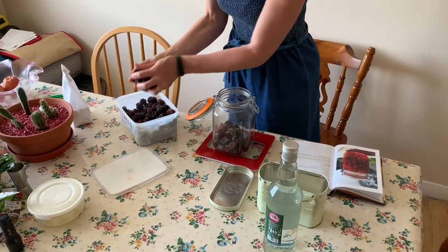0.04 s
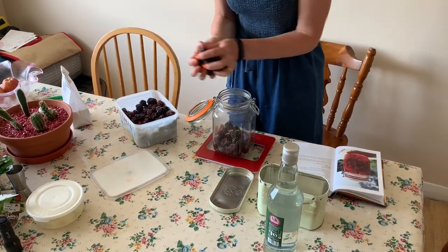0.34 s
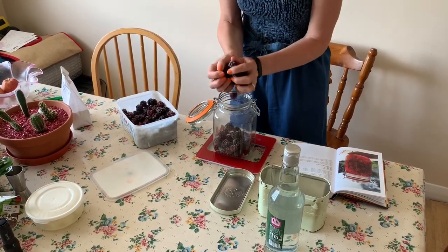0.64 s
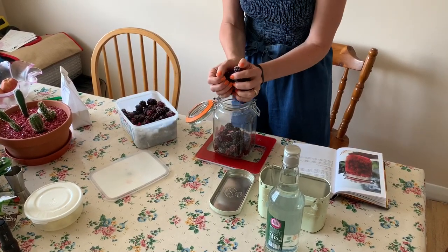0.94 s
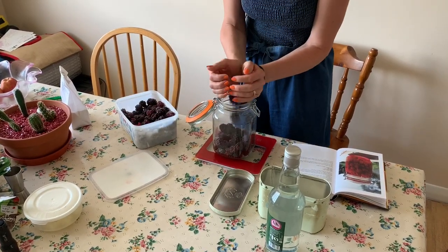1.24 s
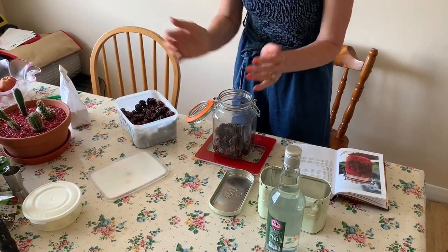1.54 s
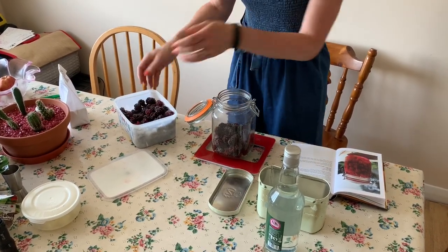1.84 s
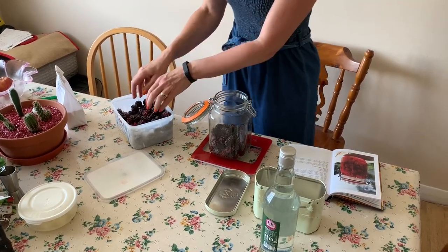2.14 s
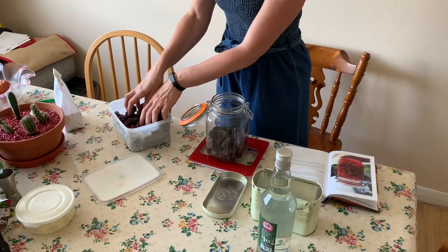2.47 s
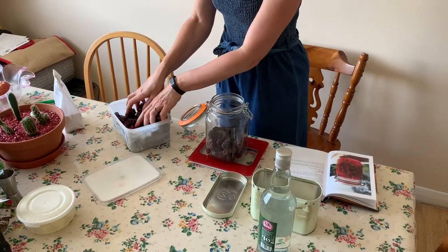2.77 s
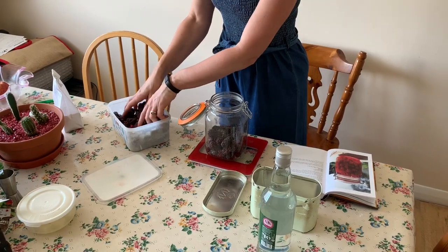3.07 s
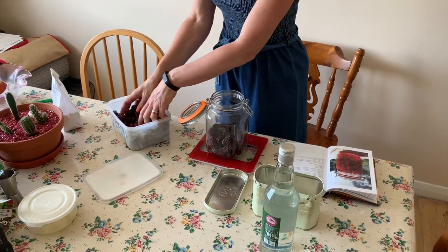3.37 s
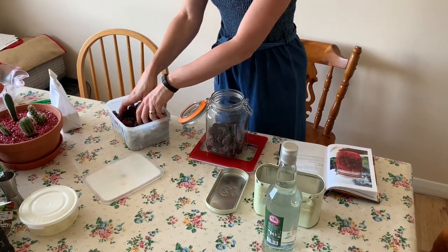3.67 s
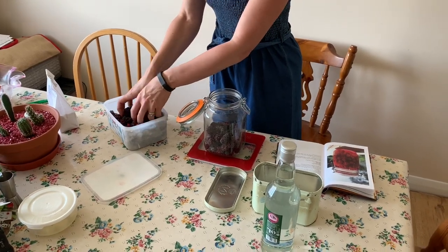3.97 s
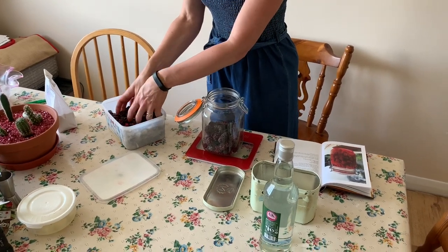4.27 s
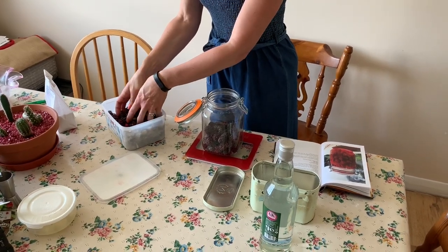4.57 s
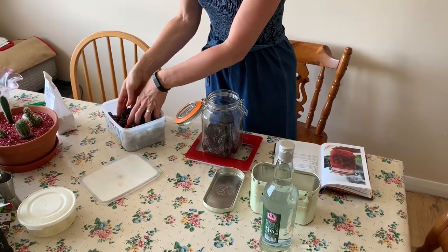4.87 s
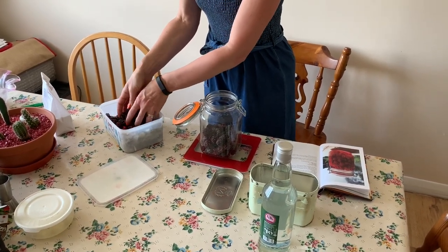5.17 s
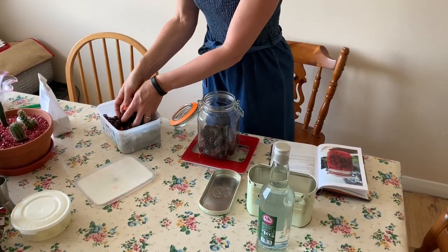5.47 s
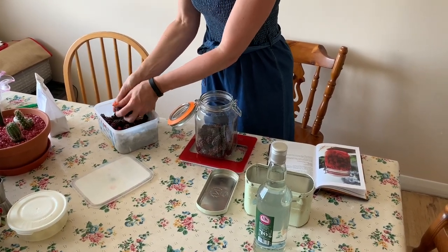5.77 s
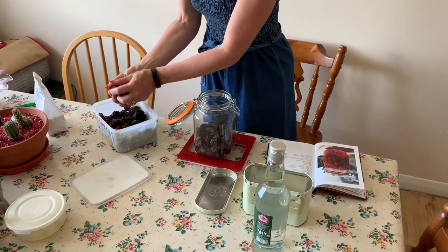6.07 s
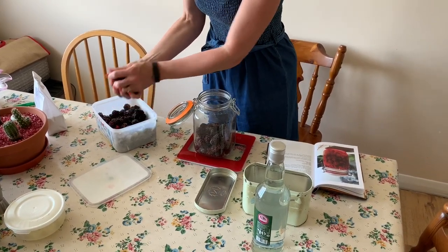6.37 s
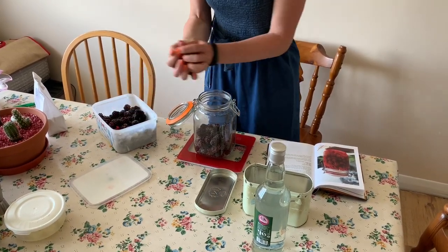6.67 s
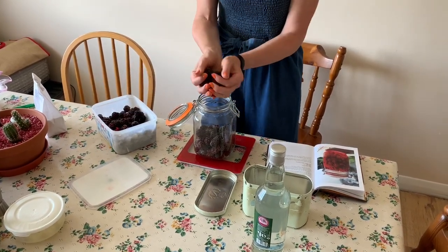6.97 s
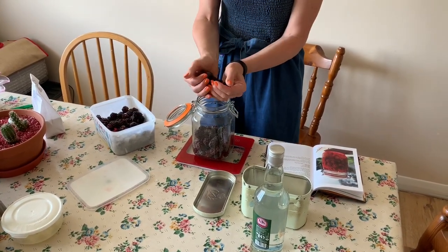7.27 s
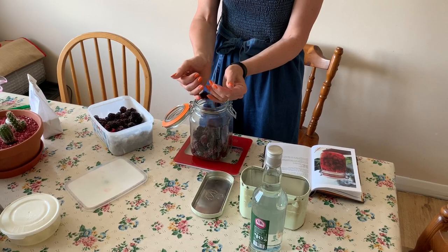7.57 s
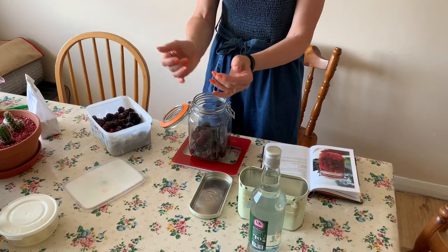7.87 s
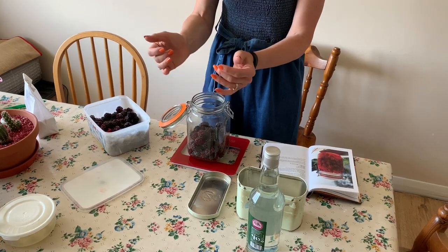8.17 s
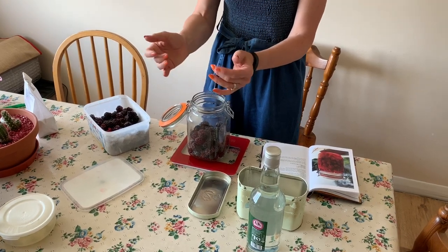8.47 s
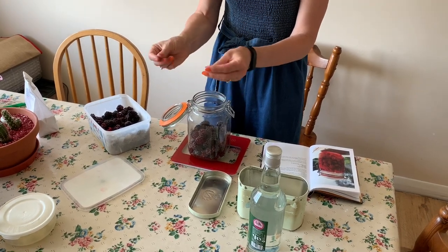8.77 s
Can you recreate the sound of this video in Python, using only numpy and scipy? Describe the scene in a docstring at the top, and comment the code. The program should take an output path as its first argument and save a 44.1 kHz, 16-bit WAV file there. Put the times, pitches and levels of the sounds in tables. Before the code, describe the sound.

Cupped hands rustle softly, then hard berries fall into a glass jar, clinking and knocking with a hollow hum. Slightly to the left, fingers dig through more berries in a plastic tub, clattering dully with ticks and an icy crunch. A second handful then drops into the jar straight ahead. The small kitchen adds a short echo, and a bird calls faintly outside.

```python
"""A faint bird outside and a rustle of cupped hands; then hard berries, probably frozen, drop into a
glass jar on a kitchen table: the glass clinks, the pile knocks and the air inside hums.
Between the two handfuls, fingers dig through the berries in a plastic tub, which clatters dully.
The jar stands almost straight ahead of a stereo microphone pair, the tub to its left,
and the small room answers every contact."""
import sys
import numpy as np
from scipy import signal
from scipy.fft import rfft, irfft, next_fast_len
from scipy.io import wavfile
from scipy.ndimage import uniform_filter1d, minimum_filter1d, map_coordinates

SR = 44100
rng = np.random.default_rng(int(sys.argv[2]) if len(sys.argv) > 2 else 0)


def pcm_store(signal):
    """Save signal as 16-bit PCM."""
    levels = np.round(np.clip(np.atleast_2d(signal), -1, 1) * 32767)
    wavfile.write(sys.argv[1], SR, levels.astype(np.int16).T)


N = 398223


def amp(db):
    """Decibels to gain."""
    return 10 ** (np.asarray(db) / 20)


def unit(x):
    """Scaled to rms 1."""
    return x / np.sqrt(np.mean(x ** 2) + 1e-20)


def along(points, hz):
    """(Hz, value) points read on a log frequency axis."""
    freqs, values = np.transpose(points)
    return np.interp(np.log(hz + 1), np.log(freqs), values)


def add(track, s, sound):
    """Mix a sound into a track at time s."""
    part = track[..., max(round(s * SR), 0):][..., :sound.shape[-1]]
    part += sound[..., :part.shape[-1]]


def filtered(x, response):
    """x shaped by a complex frequency response."""
    size = next_fast_len(N + SR // 2)
    return irfft(rfft(x, size) * response(np.fft.rfftfreq(size, 1 / SR)), size)[..., :N]


def through(x, impulse):
    """x played through an impulse response scaled to energy 1."""
    return signal.oaconvolve(x, impulse / np.linalg.norm(impulse))[:N]


def coloured(x, spectrum, size=2048):
    """Minimum-phase colouring: attacks stay sharp, and only the shape of the spectrum counts."""
    cepstrum = irfft(np.log(amp(along(spectrum, np.fft.rfftfreq(size, 1 / SR)))))
    cepstrum[1:size // 2] *= 2
    cepstrum[size // 2 + 1:] = 0
    return through(x, irfft(np.exp(rfft(cepstrum))))


def fade(t60):
    """Half a second of exponential decay."""
    return np.exp(-np.log(1000) * np.arange(SR // 2) / SR / t60)


def burst(t60):
    """A dying puff of noise."""
    return fade(t60) * rng.standard_normal(SR // 2)


def ring(modes, detune=0):
    """One decaying sine per (Hz, dB, t60) mode; its pitch wanders by the fraction detune."""
    hz, db, t60 = np.transpose(modes)[:, :, None]
    wander = signal.resample(rng.standard_normal((len(modes), 96)), SR // 2, axis=1)
    phase = 2 * np.pi * np.cumsum(hz * (1 + detune * wander), axis=1) / SR
    sign = (-1) ** np.arange(len(modes))[:, None]
    return sign * amp(db) * fade(t60) * np.sin(phase)


def grains(per_s, spread_db, t60):
    """Random tiny contacts of uneven size, each a short scrape; rms 1."""
    hits = (rng.random(N) < per_s / SR) * amp(spread_db * np.clip(rng.standard_normal(N), -2, 2))
    envelope = np.sqrt(np.abs(through(hits ** 2, fade(t60 / 2))))
    return unit(envelope * rng.standard_normal(N))


def gesture(start, length, attack, t60):
    """Gain of one movement: it rises, holds and dies away; all times in seconds."""
    t = np.arange(N) / SR - start
    return np.clip(t / attack, 0, 1) * np.exp(-np.log(1000) * np.clip((t - length) / t60, 0, 2))


def gestures(rows, attack, t60):
    """Gain of a series of (start, length, dB) movements, whose powers add."""
    return np.sqrt(sum((amp(db) * gesture(s, length, attack, t60)) ** 2 for s, length, db in rows))


def diffuse(x, spacing_m=0.13):
    """Two unrelated signals as a diffuse field at the microphone pair: alike in the bass only."""
    likeness = np.sinc(2 * np.fft.rfftfreq(x.shape[-1], 1 / SR) * spacing_m / 343)
    a, b = rfft(x)
    mid, side = a * np.sqrt((1 + likeness) / 2), b * np.sqrt((1 - likeness) / 2)
    return irfft([mid + side, mid - side], x.shape[-1])


def direct(x, lead_ms):
    """The straight path reaches the left microphone first."""
    return filtered(x, lambda hz: np.exp(1j * np.pi * hz * lead_ms / 1000 * np.array([[1], [-1]])))


# hiss of the kitchen: (frequency [Hz], relative level [dB])
HISS_SPECTRUM = [(59, -27), (100, -10), (648, -13.5), (4020, -19.5), (11000, -26), (16000, -35)]
# low rumble in the room: (time [s], level [dB])
RUMBLE_LEVELS = [(0, -69.5), (6.449, -66.5), (6.55, -57.5), (7.999, -59), (8.4, -66)]

def room_tone():
    """All around the microphones, faint hiss over a low rumble that swells and sinks."""
    def noise(spectrum):
        white = diffuse(rng.standard_normal((2, next_fast_len(N))))
        return unit(filtered(white, lambda hz: amp(along(spectrum, hz))))

    rumble = noise([(25, -35.5), (46, 0.0), (80, -14.0), (400, -26.5), (2000, -72.5)])
    swell = amp(np.interp(np.arange(N) / SR, *np.transpose(RUMBLE_LEVELS)))
    return amp(-76.5) * noise(HISS_SPECTRUM) + swell * rumble


# calls from outside: (time [s], relative level [dB])
BIRD_CALLS = [(0.04, -78), (1.559, -80), (6.045, -79), (6.22, -89), (8.555, -80.5)]

def bird(start_hz=4250, end_hz=3400, length_s=.24, rasp_hz=380):
    """A hoarse, falling whistle that swells quickly and trails off."""
    calls, progress = np.zeros(N), np.linspace(0, 1, round(length_s * SR))
    glide = end_hz + (start_hz - end_hz) * (1 - progress) ** 2.1
    envelope = unit(np.sqrt(progress) * (1 - progress) ** 2)
    for s, db in BIRD_CALLS:
        rasp = rasp_hz * unit(uniform_filter1d(rng.standard_normal(len(progress)), size=40))
        add(calls, s, amp(db) * envelope * np.sin(2 * np.pi * np.cumsum(glide + rasp) / SR))
    return calls


# reverberation of the small kitchen: (frequency [Hz], t60 [s])
KITCHEN_DECAY = [(100, 0.44), (600, 0.42), (2500, 0.37), (7000, 0.31), (15000, 0.2)]

def kitchen(x, walls_db, near_db, near_t60):
    """Things on the table scatter the sound, then the walls answer; the paths change as the arms move."""
    wet, step = np.zeros((2, N)), SR // 4
    onset = 1 - fade(0.0038)
    for start in range(0, N, step):
        hz, t, noise = signal.stft(rng.standard_normal((2, SR // 2)), SR, nperseg=256)
        decay = np.exp(-np.log(1000) * t / along(KITCHEN_DECAY, hz)[:, None])
        tail = onset * signal.istft(noise * decay, SR, nperseg=256)[1][:, :SR // 2]
        near = np.array([burst(near_t60), burst(near_t60)])
        echo = amp(walls_db) * tail / np.linalg.norm(tail[0])
        echo += amp(near_db) * near / np.linalg.norm(near[0])
        add(wet, start / SR, signal.fftconvolve(x[None, start:start + step], diffuse(echo), axes=1))
    return wet


# berries shifting in cupped hands, ahead of the pair: (time [s], length [s], level [dB])
HAND_SHIFTS = [(.45, 0.016, -58), (.6, 0.68, -60.5), (5.92, 0.16, -66.5), (6.53, .72, -68),
               (6.575, 0.032, -60.5), (6.755, 0.016, -51), (6.84, 0.029, -64.5), (7.0, 0.029, -63),
               (8.91, 0.015, -75)]
# rubbing on skin: (frequency [Hz], relative level [dB])
SKIN_SPECTRUM = [(180, -18), (700, -12.5), (3500, -3), (6500, -11), (8500, -20.5), (15000, -28.5)]
# hollow of the palms: (frequency [Hz], relative level [dB], t60 [s])
PALM_MODES = [(1600, 0, .005), (2450, 1, .004)]

def hands():
    """The carried handful rubs softly against the skin and sounds in the hollow of the palms."""
    shifting = gestures(HAND_SHIFTS, attack=.028, t60=.36)
    outer, inner = (shifting * grains(per_s=350, spread_db=4, t60=.015) for _ in range(2))
    return coloured(outer, SKIN_SPECTRUM) + amp(-4.5) * through(inner, ring(PALM_MODES).sum(0))


# ticks of hard berries: (time [s], level [dB])
BERRY_TICKS = [(2.3758, -10), (2.561, -30), (2.848, -14), (3.0234, -20.5), (3.2747, -22), (3.439, -28.5),
               (3.4622, -19), (3.8812, -25), (4.0845, -22.5), (4.196, -25.5), (4.2787, -24.5),
               (4.6439, -24.5), (4.75, -24.5), (6.521, -44.5), (6.768, -44), (8.04, -45)]
# their colour: (frequency [Hz], relative level [dB])
TICK_SPECTRUM = [(1500, -14.5), (9000, 2), (16000, -2)]

def berry_ticks():
    """Short, bright ticks of hard berries in the tub and hands, and a last faint tick in the jar."""
    ticks = np.zeros(N)
    for s, db in BERRY_TICKS:
        add(ticks, s, amp(db) * burst(0.003))
    return coloured(ticks, TICK_SPECTRUM)


# resonances of the plastic tub: (frequency [Hz], bandwidth [Hz], relative level [dB])
TUB_MODES = [(277.5, 74, -7.5), (439, 53, -9), (670.5, 35, -9.5), (785.7, 46, -1), (986, 81, -5),
             (1138, 40, -8), (1311, 140, -6.5)]

def bump(favoured_hz, favour_db=7, favour_octaves=0.29, rise_s=.008):
    """One round knock on the tub, peak 1; the spot struck favours the resonances near one pitch."""
    hz, width, db = np.transpose(TUB_MODES)[:, :, None]
    t = np.arange(SR // 8) / SR
    strength, shift, sign = rng.standard_normal((3, len(TUB_MODES), 1))
    favour = favour_db * np.exp(-(np.log2(hz / favoured_hz) / favour_octaves) ** 2)
    gain = np.sign(sign) * width * amp(db + favour + 2 * strength)
    loaded_hz = hz * (1 + .02 * shift)  # the load of berries shifts each resonance
    modes = gain * np.exp(-np.pi * width * t) * np.sin(2 * np.pi * loaded_hz * t)
    knock = modes.sum(0) * (1 - fade(rise_s)[:len(t)])
    return knock / np.abs(knock).max()


def tumble(per_s=70):
    """Berries rolling over each other bump the tub at random moments and places; rms 1."""
    bumps = np.zeros(N)
    for when, place, size in rng.random((round(per_s * N / SR), 3)):
        add(bumps, when * N / SR, amp(6 * size) * bump(250 * 6 ** place))
    return unit(bumps)


# unbroken stirring in the tub, left of the pair: (time [s], length [s])
STIRS = [(2.183, 2.268), (4.574, 1.162)]
# fingers pushing in: (time [s], length [s], relative clatter level [dB], crunch level [dB])
FINGER_PUSHES = [(2.205, 0.17, -38.5, -53), (2.368, 0.075, -30, -41), (2.573, 0.062, -30.5, -40.5),
                 (2.707, .065, -34.5, -41), (2.826, 0.12, -35.5, -47), (2.995, 0.076, -32.5, -39),
                 (3.145, 0.14, -32, -47), (3.485, .08, -33, -48.5), (3.831, .11, -33.5, -44.5),
                 (4.072, 0.022, -33, -33.5), (4.158, 0.063, -36, -47.5), (4.281, 0.059, -36.5, -47.5),
                 (4.628, 0.036, -33, -43.5), (4.781, 0.031, -29.5, -39.5), (4.888, 0.029, -32.5, -41.5),
                 (5.099, 0.097, -32, -43.5), (5.522, 0.11, -37.5, -51.5)]
# berries knocking on the plastic: (time [s], level [dB], favoured pitch [Hz])
TUB_KNOCKS = [(2.31, -26.5, 762), (2.375, -18.5, 770), (2.582, -18, 750), (2.715, -26.5, 772),
              (2.753, -27, 805), (2.847, -22.5, 1000), (3.047, -23.5, 802), (3.152, -24.5, 795),
              (3.185, -24, 950), (3.299, -22, 775), (3.853, -22, 805), (3.888, -16.5, 794),
              (4.645, -24, 816), (4.8, -30, 791), (4.912, -28, 1276), (5.133, -24, 794), (5.166, -27, 1020),
              (5.473, -23, 760), (5.54, -24, 404), (5.621, -26.5, 690)]
# plastic clatter and icy crunch: (frequency [Hz], relative level [dB])
CLATTER_SPECTRUM = [(60, -22), (220, -9.5), (1000, -2.5), (1900, -4), (3300, -9), (16000, -35.5)]
CRUNCH_SPECTRUM = [(500, -19.5), (2000, 9), (5000, -8.5), (7500, -0.5), (11000, 3.5), (16000, -6)]

def tub():
    """Each push of the fingers rolls berries against the plastic, while their icy skins crunch."""
    stir = sum(gesture(s, length, attack=.045, t60=.28) for s, length in STIRS)
    pushing = gestures([(s, length, db) for s, length, db, _ in FINGER_PUSHES], attack=.02, t60=.13)
    crushing = gestures([(s, length, db) for s, length, _, db in FINGER_PUSHES], attack=.02, t60=.12)
    effort = np.hypot(pushing, amp(-41.5) * stir)
    clatter = effort * grains(per_s=280, spread_db=3, t60=.012)
    crunch = np.hypot(crushing, amp(-60.5) * stir) * grains(per_s=520, spread_db=3.6, t60=.008)
    knocks = np.zeros(N)
    for s, db, hz in TUB_KNOCKS:
        add(knocks, s, amp(db) * bump(hz))
        add(clatter, s, amp(db - 13) * burst(.1))  # rattle after the knock
    rolling = amp(-6) * (effort * tumble() + coloured(clatter, CLATTER_SPECTRUM))
    return knocks + rolling + coloured(crunch, CRUNCH_SPECTRUM)


# berries landing on the pile in the jar: (time [s], air note level [dB], knock level [dB])
LANDINGS = [(0.704, -43.5, -39), (0.868, -38, -36), (0.974, -42.5, -42.5), (1.003, -33.5, -38.5),
            (1.074, -35, -41.5), (1.23, -32.5, -41.5), (7.264, -43, -48.5), (7.393, -33, -48.5),
            (7.479, -26.5, -53)]
# the packed pile and the jar's base: (frequency [Hz], relative level [dB], t60 [s])
BASE_MODES = [(700, -9.5, .05), (893, 0, 0.044), (1296, -2.5, 0.092)]

def thuds():
    """A berry lands on the pile, which knocks dully together with the base of the jar."""
    knocks = np.zeros(N)
    for s, _, db in LANDINGS:
        add(knocks, s, amp(db) * ring(BASE_MODES, detune=.02).sum(0))
    return knocks


# runs of berries into the jar: (time [s], length [s], rattle level [dB], hum level [dB])
JAR_POURS = [(0.963, 0.39, -37, -48), (7.266, 0.057, -48, -51.5), (7.388, 0.12, -36, -40.5),
             (7.506, .14, -34, -37), (7.738, 0.12, -61.5, -52.5), (8.009, 0.038, -63.5, -58.5)]
POUR_ATTACK_S = 0.016

def pours():
    """Many small contacts keep the glass faintly ringing and rattle the pile."""
    ringing, rattle = np.zeros((2, N))
    contacts = grains(per_s=240, spread_db=3.5, t60=.01)
    for s, length, db, _ in JAR_POURS:
        settling = amp(db) * gesture(s, length, POUR_ATTACK_S, t60=0.035) * contacts
        ringing += amp(-15) * through(settling, glass_wall(s).sum(0))
        rattle += settling
    return ringing, rattle


# the air in the jar: (frequency [Hz], relative level [dB], t60 [s])
AIR_MODES = [(385, 1, .15), (1178, -9, .12)]
# hands over the mouth lower the bottom note: (time [s], pitch factor)
MOUTH_COVER = [(.85, 1), (1.0, 0.9), (1.25, .96), (1.45, 1)]

def air_hum(width_hz=26, finger_width_hz=420):
    """The air in the jar hums as long as berries keep falling and swells at each landing."""
    t = np.arange(N) / SR
    mouth = np.interp(t, *np.transpose(MOUTH_COVER))
    held = gestures([(s, length, db) for s, length, _, db in JAR_POURS], POUR_ATTACK_S, t60=.15)
    unsettled_hz = finger_width_hz * (1 - mouth)  # moving fingers unsettle the notes
    knots = [t * 3 * width_hz]
    hum = np.zeros(N)
    for (hz, db, t60), pitch in zip(AIR_MODES, (mouth, 1)):
        struck = np.zeros(N)
        for s, air_db, _ in LANDINGS:
            add(struck, s, amp(air_db) * (1 - fade(0.03)) * fade(t60))
        drift, swell = (map_coordinates(rng.standard_normal(N // 500), knots) for _ in range(2))
        width = width_hz * np.sqrt(hz / AIR_MODES[0][0]) + unsettled_hz
        phase = 2 * np.pi * np.cumsum(hz * pitch + width / 2 * drift) / SR
        hum += amp(db + 2.5 * swell) * np.hypot(held, struck) * np.sin(phase)
    return hum


# the jar's glass wall: (frequency [Hz], relative level [dB], t60 before damping [s])
GLASS_MODES = [(2124, -4, 0.14), (2380, -2.5, 0.099), (2487, -0.5, 0.1), (2530, -3.5, 0.015),
               (2764, -9, 0.18), (3420, 0.5, 0.19), (4292, -1, 0.22), (4345, -4, 0.22), (4610, -11, 0.62),
               (5510, -12.5, 0.09), (6350, -5, 0.072), (7150, 3.5, 0.027), (8000, -7.5, 0.034)]
# a fuller jar rings shorter and less purely: (time [s], t60 factor, pitch wander [fraction])
JAR_FILL = [(1.4, .8, .015), (7.3, .45, .03)]

def glass_wall(s):
    """The modes of the glass at time s, damped and slightly retuned by the berries lying against it."""
    times, factors, wanders = np.transpose(JAR_FILL)
    damping, wander = np.interp(s, times, factors), np.interp(s, times, wanders)
    modes = [(hz * (1 + .5 * wander * rng.standard_normal()), db, t60 * damping)
             for hz, db, t60 in GLASS_MODES]
    return ring(modes, detune=wander)


# berries striking the glass, ahead of the pair:
# (time [s], low, middle, high and top mode family levels [dB], crack level [dB])
GLASS_STRIKES = [(0.705, -36, -34.5, -32.5, -34.5, -27), (0.819, -41.5, -36, -42, -51, -43),
                 (0.867, -37, -50.5, -50.5, -37, -25), (.983, -35, -46.5, -36.5, -29, -17.5),
                 (1.0012, -28.5, -33.5, -22.5, -35, -22.5), (1.0963, -28.5, -34, -24.5, -33, -29),
                 (1.135, -25, -17.5, -16.5, -9.5, -14), (1.23, -44, -39.5, -28.5, -28, -28.5),
                 (1.3025, -16, -25, -20, -28, -20.5), (1.313, -19.5, -26.5, -24.5, -41.5, -27.5),
                 (7.263, -44, -61.5, -46, -55.5, -40), (7.391, -37, -47, -38.5, -38.5, -28.5),
                 (7.5, -16.5, -29.5, -19.5, -18.5, -13.5), (7.596, -19.5, -30, -26.5, -36.5, -20),
                 (7.631, -12, -25.5, -20.5, -33.5, -18)]
# borders between the four families: (frequency [Hz])
FAMILY_BORDERS = [3000, 3800, 5000]
# crack of the contact: (frequency [Hz], relative level [dB])
CRACK_SPECTRUM = [(400, -23.5), (2300, -5), (5200, -9), (6400, -1.5), (8000, -0.5), (9000, -8.5),
                  (16000, -15)]

def clinks():
    """A berry cracks against the glass and jolts the pile; each spot rings the modes differently."""
    ringing, pings, cracks, jolts = np.zeros((4, N))
    family = np.searchsorted(FAMILY_BORDERS, np.array(GLASS_MODES)[:, 0])
    top = family == len(FAMILY_BORDERS)
    for s, *family_db, crack_db in GLASS_STRIKES:
        modes = amp(family_db)[family, None] * glass_wall(s)
        add(ringing, s, modes[~top].sum(0))
        add(pings, s, modes[top].sum(0))
        add(cracks, s, amp(crack_db) * burst(0.022))
        add(jolts, s, amp(np.mean(family_db) - 8.5) * burst(0.13))
    return ringing, pings + coloured(cracks, CRACK_SPECTRUM), jolts


# rattle of the pile in the jar: (frequency [Hz], relative level [dB])
PILE_SPECTRUM = [(200, -31.5), (330, -9), (550, -36.5), (900, -7.5), (1800, -3.5), (2300, 7), (3100, -2),
                 (4400, 2), (5200, -5.5), (8000, -7), (9000, -10.5), (16000, -22.5)]

def jar():
    """Handfuls fall into the jar. Returns the ringing with its rattle, and the blows with their hum."""
    clink_ring, strikes, jolts = clinks()
    knocks = thuds()
    pour_ring, rattle = pours()
    ringing = clink_ring + pour_ring + coloured(jolts + rattle, PILE_SPECTRUM)
    return ringing, strikes + knocks + air_hum()


def scene():
    """Jar ahead, tub to the left; blows reach the pair mostly straight, the bird only off the walls."""
    ringing, blows = jar()
    digging, ticks = tub(), berry_ticks()
    ahead = ringing + hands()
    into_room = ahead + amp(-7) * (blows + ticks) + amp(-2) * digging + amp(18) * bird()
    room = kitchen(into_room, walls_db=1, near_db=-8, near_t60=0.14)
    table = direct(ahead + blows, lead_ms=0.058) + direct(digging + ticks, lead_ms=0.18)
    return table + room + room_tone()


def record(dry, split_hz=6500, lag_ms=.212, in_phase_hz=11000, ceiling_db=-.5, top_hz=15900):
    """The left microphone feeds both channels' treble; a fast limiter and a band limit follow."""
    def treble_share(hz):
        return 1 / (1 + (split_hz / (hz + 1)) ** 20)

    def apart(hz):  # the channels' treble is slightly apart in time, in phase at one frequency
        return np.exp(1j * np.pi * (hz - in_phase_hz) * lag_ms / 1000 * np.array([[-1], [1]]))

    pair = filtered(dry, lambda hz: np.sqrt(1 - treble_share(hz)))
    pair += filtered(dry[0], lambda hz: -np.sqrt(treble_share(hz)) * apart(hz))
    span = round(.001 * SR)  # the limiter acts within 1 ms
    needed = np.minimum(1, amp(ceiling_db) / (np.abs(pair).max(0) + 1e-9))
    gain = uniform_filter1d(minimum_filter1d(needed, 2 * span), span)
    return filtered(pair * gain, lambda hz: hz < top_hz)


dry = scene()
out = record(dry)
pcm_store(out)
```